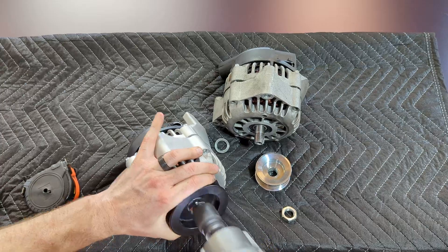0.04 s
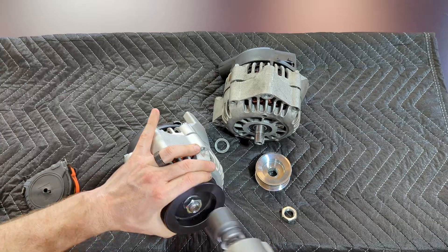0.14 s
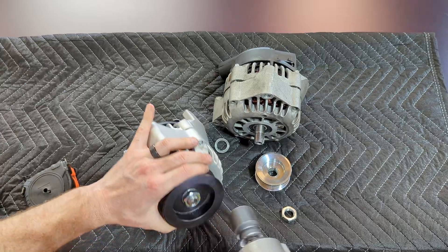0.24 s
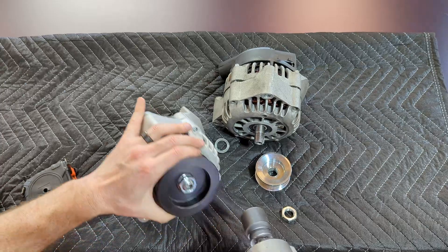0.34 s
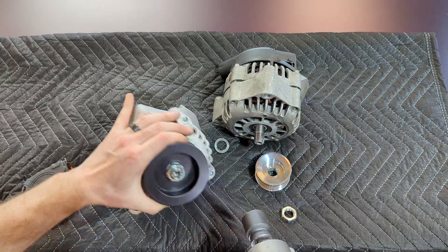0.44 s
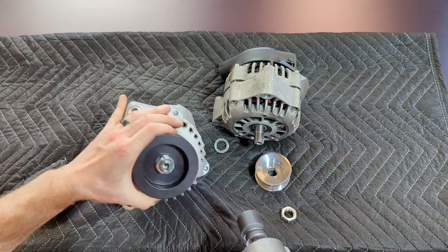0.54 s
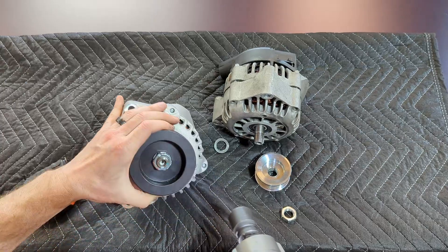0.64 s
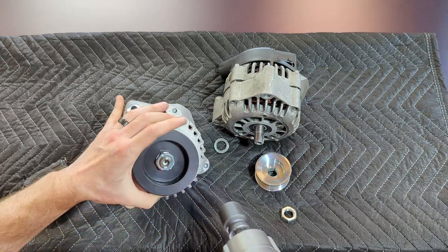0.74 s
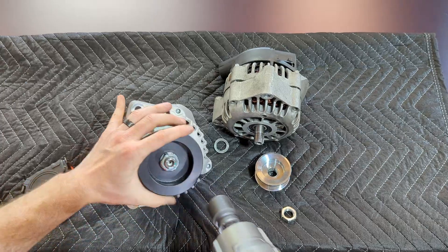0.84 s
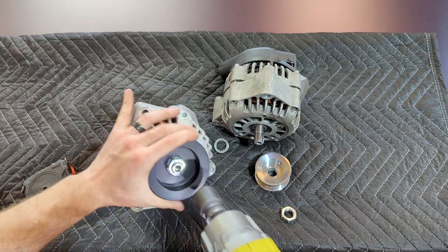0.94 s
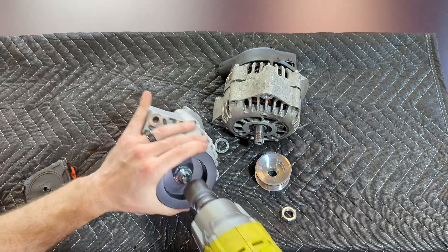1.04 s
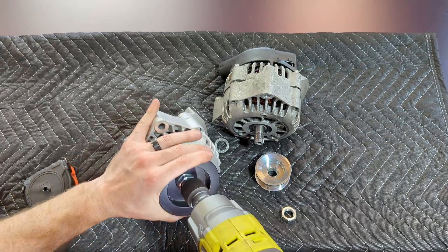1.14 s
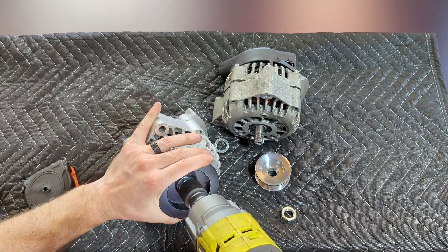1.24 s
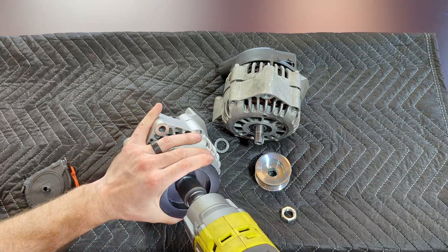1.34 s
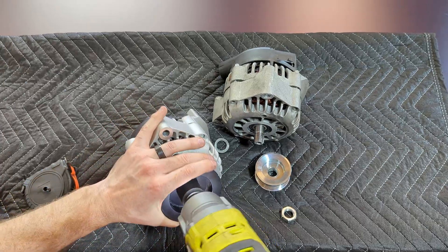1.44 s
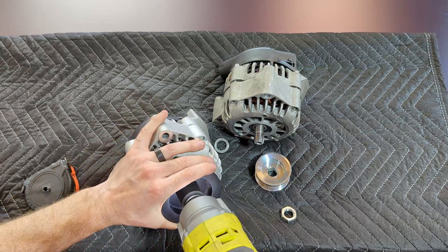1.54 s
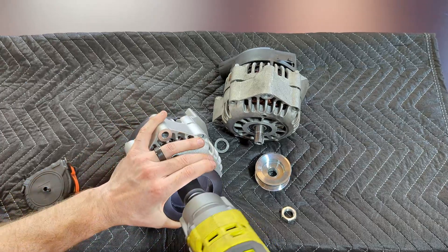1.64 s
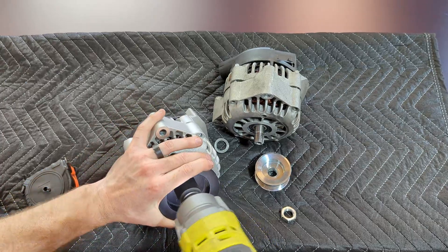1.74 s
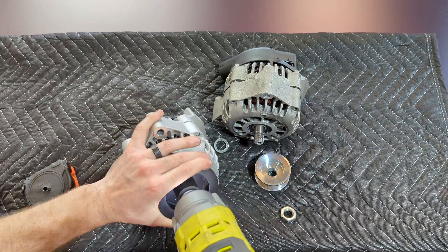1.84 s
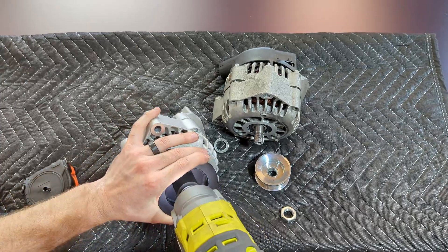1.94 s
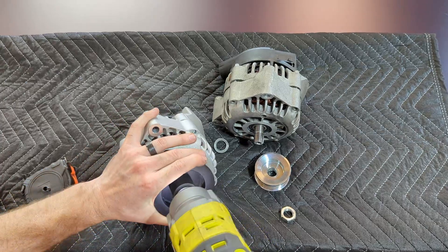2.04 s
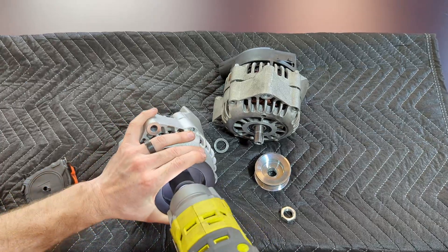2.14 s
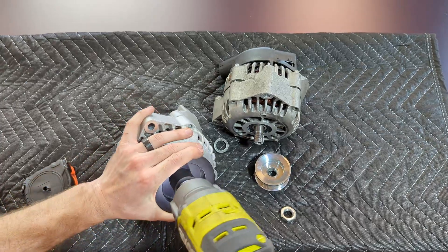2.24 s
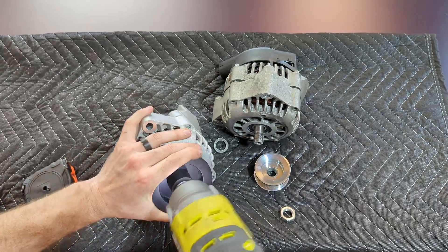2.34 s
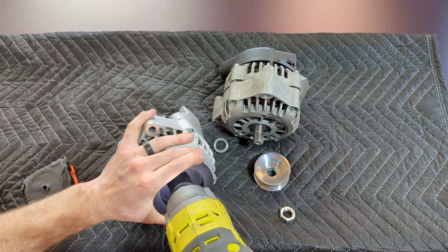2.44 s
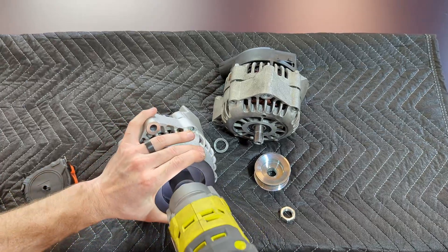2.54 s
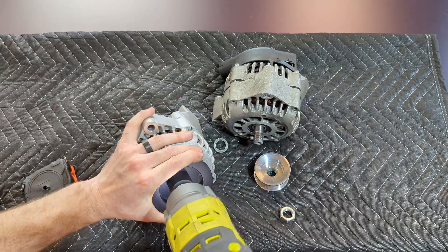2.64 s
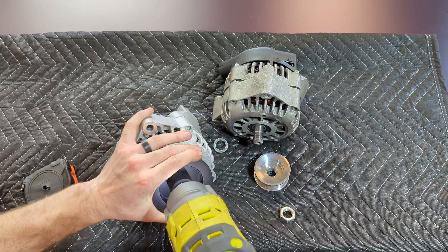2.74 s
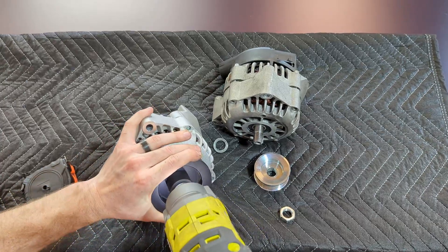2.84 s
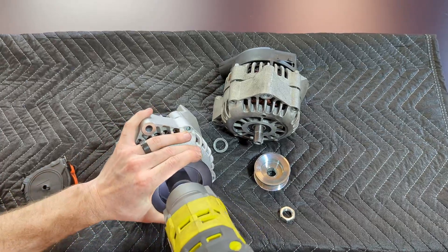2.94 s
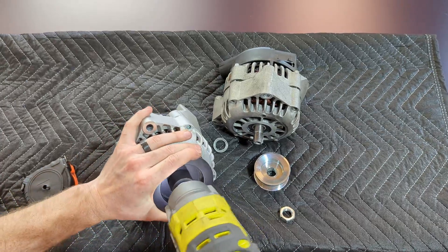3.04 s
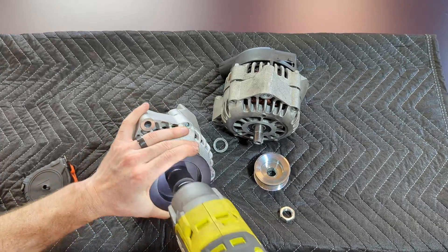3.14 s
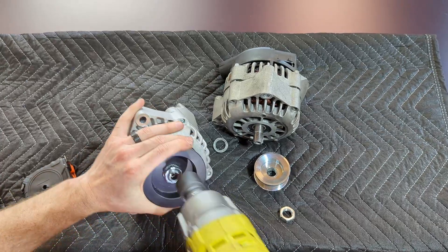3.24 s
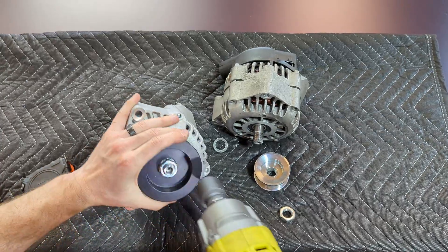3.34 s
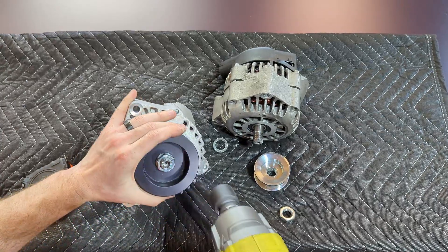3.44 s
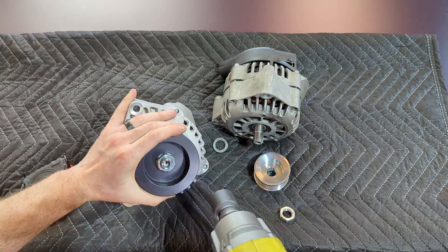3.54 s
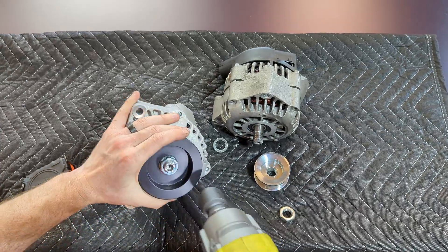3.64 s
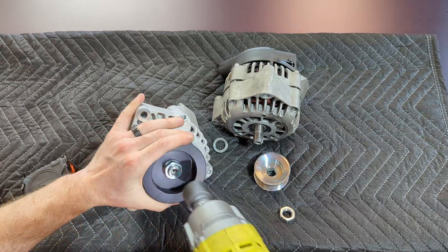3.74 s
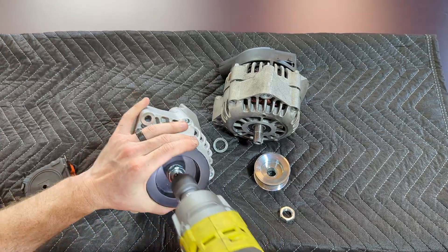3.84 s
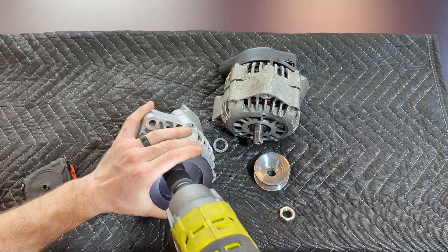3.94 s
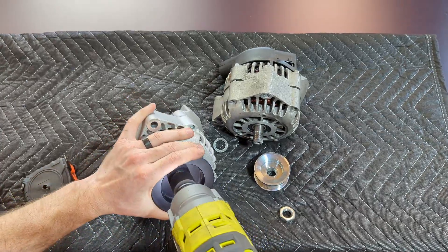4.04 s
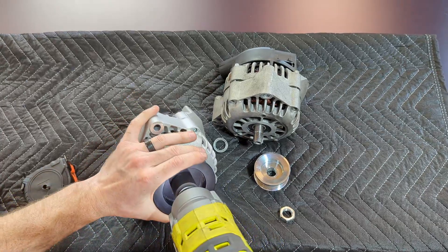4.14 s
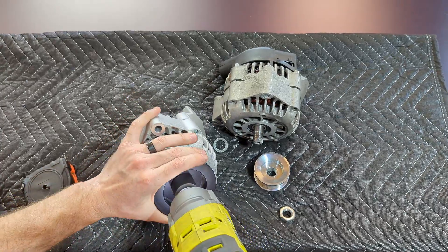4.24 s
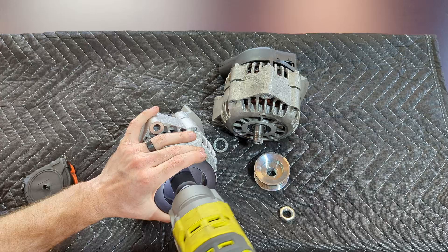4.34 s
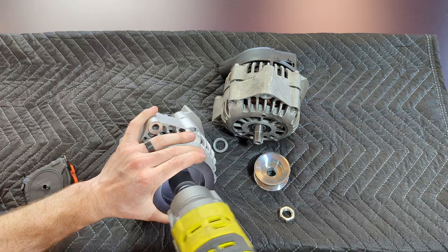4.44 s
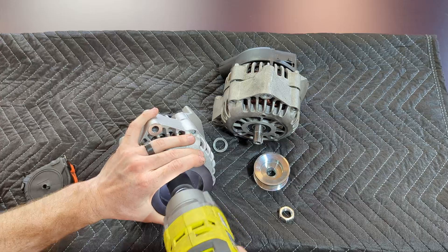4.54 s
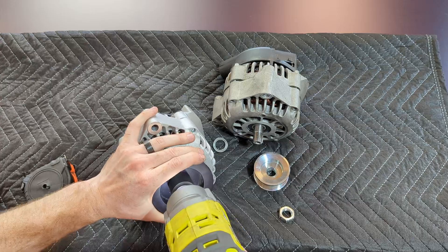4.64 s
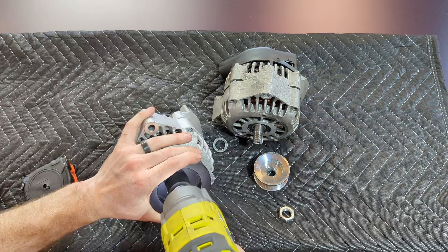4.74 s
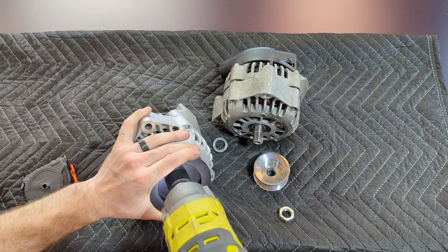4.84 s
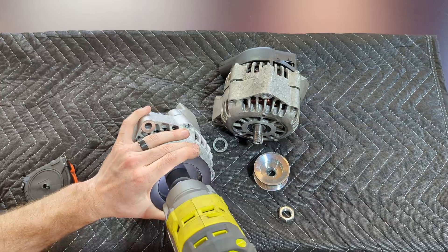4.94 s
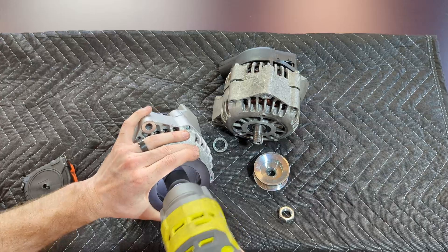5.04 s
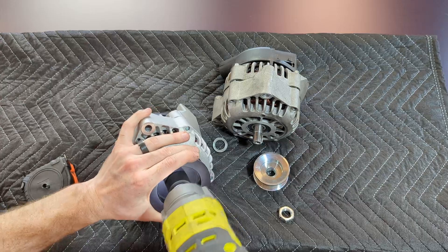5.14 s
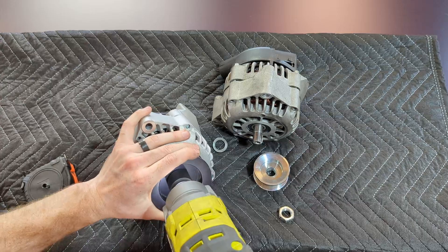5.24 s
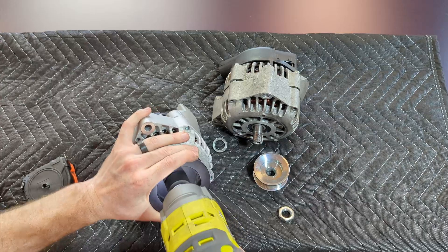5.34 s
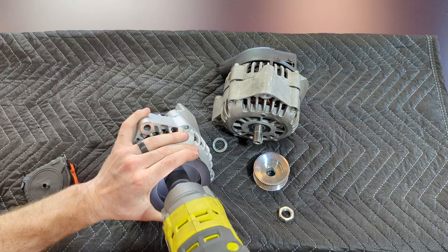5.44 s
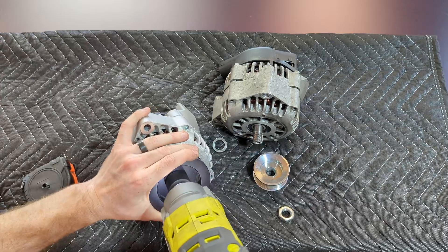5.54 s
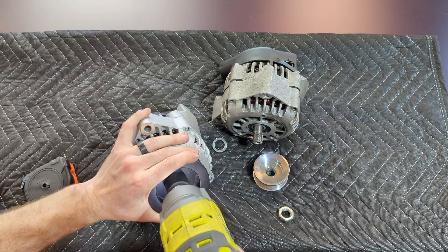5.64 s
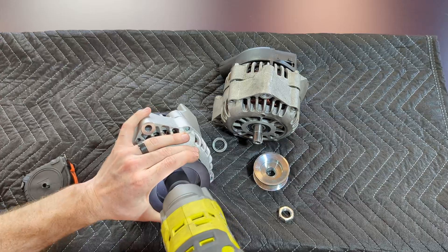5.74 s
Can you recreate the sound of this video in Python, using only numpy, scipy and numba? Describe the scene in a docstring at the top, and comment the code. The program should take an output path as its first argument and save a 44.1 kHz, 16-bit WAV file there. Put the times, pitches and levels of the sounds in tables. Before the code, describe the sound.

A dying metallic echo fades at the start, leaving faint low rumble and hiss; a soft air pop hits mainly the left side at 0.4 s. From 1.3 to 1.6 s a steel socket ticks and clinks onto a nut, ending with a dull double thud of the heavy housing on padding. An impact wrench bursts at 1.7-1.9, 2.0-2.2 and 2.4-3.1 s: quick motor spin-up, hard first bite, then uneven blows around eighty per second, bright and ringing, over rasping gears that whine down. Slower, drier stutters precede and follow the long burst. Quiet returns around 3.4 s with a tiny bump at 3.6. Clinks with thin high pings come at 4.0-4.3 s, then bursts at 4.5-4.7, 4.8-5.0 and 5.1-5.8 s, the last nearly to the end. Close stereo, peaks limited, low gusts from the tool's fan, short diffuse workshop echo.

```python
"""A cordless impact wrench tightens the nut of an alternator pulley on a padded bench in a small workshop.
In each burst the motor spins up, the hammer strikes uneven blows that ring socket and pulley as decaying sines
under cracks of noise, and the gears rasp, whine and coast down. Before the bursts the socket clinks onto the nut.
The tool's fan blows on the two close microphone ports as gusty low noise; a faint rumble and hiss lie behind."""
import sys
import numpy as np
from scipy import signal
from scipy.fft import rfft, irfft
from scipy.io import wavfile
from scipy.ndimage import uniform_filter1d, minimum_filter1d
from numba import njit

SR = 44100
rng = np.random.default_rng(int(sys.argv[2]) if len(sys.argv) > 2 else 0)


def bounce(signal):
    """Save signal as a 16-bit WAV file at the path given by the first command-line argument."""
    frames = np.transpose(np.atleast_2d(signal))
    limited = np.clip(frames, -1, 1)
    pcm = np.round(limited * 32767).astype(np.int16)
    wavfile.write(sys.argv[1], SR, pcm)


N = 255780
T = np.arange(N) / SR

# Pulls of the trigger: pressed_s, hammer_bites_s, eased_s, blows_db, bite_crack_db, bite_ring_db, gears_db,
# overrun_speed_hz, coast_s
PULLS = [(1.712, 1.7259, 1.907, -3.5, -7, -8.5, -24.5, 295, .21),
         (2.035, 2.0667, 2.23, 0, -9.5, -4.5, -25, 240.4, .28),
         (2.356, 2.3654, 3.08, -.5, -1, -16, -25.5, 210, .28),
         (4.447, 4.47, 4.66, -2, -0.5, -0.5, -25.5, 279.8, .18),
         (4.757, 4.787, 4.975, -2, -9, -3, -26, 295, .19),
         (5.074, 5.111, 5.803, -.5, -5.5, -2, -25, 220, .2)]
# Modes of socket, shaft and pulley: mode_hz, level_db, t60_s
STEEL_MODES = [(281, -18, 0.18), (463, -39.5, 0.06), (572.6, -12, 0.13), (719, -6, 0.046),
               (1180, -31, .025), (1302, -1, 0.09), (1371, 3, 0.083), (1421, 0, 0.082), (1440, -1, 0.037),
               (2605, 2, 0.072), (2580, 7.5, 0.064), (2688, 3.5, 0.11), (2620, -13, .03),
               (3990, -37, 0.019), (5750, -10.5, .07), (6070, 1.5, 0.076), (6520, -7, 0.1),
               (7200, -17.5, 0.051), (8500, -14.5, 0.032), (9552, -12.5, .05), (12800, -14.5, 0.055)]
# Noise spectrum of a hard, dry knock: frequency_hz, density_db
KNOCK_SPECTRUM = [(100, -25.5), (600, -20.5), (1500, -4.5), (2500, 0.5), (4000, 5), (7000, -2.5),
                  (10000, -1.5), (13000, -11.5), (16000, -25.5)]
# Noise spectrum of the gears: frequency_hz, density_db
GEAR_SPECTRUM = [(100, -20), (300, -9.5), (800, -4.5), (1400, -0.5), (2000, 1.5), (3300, 5), (5000, 0.5),
                 (7000, -3.5), (9700, -0.5), (11500, -12.5), (16000, -29)]
# Rotor speed under the hammer's load
LOADED_HZ = 219.5


def undb(db):
    """Decibels to gain."""
    return 10 ** (np.asarray(db) / 20)


def unit(x):
    """Scale to rms 1."""
    return x / np.sqrt(np.mean(x ** 2))


def along(points, hz):
    """Read (Hz, value) points on a log-frequency axis."""
    f, value = np.transpose(points)
    return np.interp(np.log(np.maximum(hz, 1)), np.log(f), value)


def bins(x):
    """Frequencies of the spectrum of x."""
    return np.fft.rfftfreq(x.shape[-1], 1 / SR)


def colour(x, points):
    """Filter by (Hz, dB) points, keeping the power of white noise."""
    gain = unit(undb(along(points, bins(x))))
    return irfft(rfft(x) * gain, x.shape[-1])


def ring(x, response):
    """Play x through an impulse response."""
    return signal.fftconvolve(np.atleast_2d(x), np.atleast_2d(response), axes=-1)[:, :N]


def fade(t60):
    """Exponential decay, half a second long."""
    return np.exp(-np.log(1000) * T[:SR // 2] / t60)


def strikes(times, db):
    """A train of impulses."""
    x = np.zeros(N)
    inside = times < T[-1]
    samples = (np.maximum(times[inside], 0) * SR).astype(int)
    np.add.at(x, samples, undb(db)[inside])
    return x


def hiss():
    """Noise at two ports, whose likeness varies with frequency."""
    # How alike the two ports hear it: frequency_hz, likeness (0-1)
    likeness = [(100, 0.04), (600, 1), (1400, 0.8), (3000, 0.7), (6000, 0.87), (10000, 0.6), (16000, 0.05)]
    mid, side = rfft(rng.standard_normal((2, N)))
    like = np.clip(along(likeness, bins(T)), 0, 1)
    mid = mid * np.sqrt((1 + like) / 2)
    side = side * np.sqrt((1 - like) / 2)
    return irfft([mid + side, mid - side], N)


@njit
def sines(rows, length):
    """Add a decaying sine for each row of (start sample, radians per sample, gain, samples to fall 60 dB)."""
    out = np.zeros(length)
    for start, step, gain, life in rows:
        z = gain + 0j
        pole = np.exp(1j * step - np.log(1000) / life)
        for i in range(int(start), min(int(start + life), length)):
            z *= pole
            out[i] += z.imag
    return out


def crack(times, db, spectrum, t60):
    """Countless short-lived modes: a burst of noise at each contact."""
    pole = np.exp(-np.log(1000) / (t60 * SR))
    # the tiny offset keeps the decay clear of denormal numbers
    envelope = signal.lfilter([1], [1, -pole], strikes(times, db) + 1e-18)
    return colour(envelope * hiss(), spectrum)


def modes(times, db, table, sustain=1, tilt=0, scatter_db=2.2, detune=.0045):
    """Each contact lands differently: it shares its force anew among the modes and detunes them a little."""
    hz, mode_db, t60 = np.transpose(table)
    chance = rng.standard_normal((len(times), 2, len(hz)))
    # a positive tilt lifts the modes above 2 kHz and lowers those below
    tilt_db = np.outer(tilt, np.tanh(2 * np.log2(hz / 2000)))
    gain = undb(db[:, None] + mode_db + scatter_db * chance[:, 0] + tilt_db)
    step = 2 * np.pi * hz * (1 + detune * chance[:, 1]) / SR
    start = np.maximum(times, 0)[:, None] * SR
    rows = np.stack(np.broadcast_arrays(start, step, gain, t60 * sustain * SR), axis=-1)
    return sines(np.concatenate(rows), N)


def hammer(jitter=.15, scatter_db=3.0, rebound_share=.55, rebound_db=-11, bright_db=4.0):
    """Uneven blows on the anvil; after each the loose socket rebounds against the nut."""
    # Noise spectrum of a hammer blow: frequency_hz, density_db
    blow_spectrum = [(100, -22.5), (250, -13), (800, -7), (1300, 9.5), (1900, 1.5), (3000, 7), (4500, 3.5),
                     (7000, 1.5), (10000, 1.5), (13000, -2.5), (16000, -10.5)]
    blows_per_s, bite_s = 82, .026  # steady hammering begins once the bite is over
    blows = []
    for _, bite, end, db, *_ in PULLS:
        chance = rng.standard_normal((96, 4))
        gaps = np.maximum(1 + jitter * chance[:, 0], .5) / blows_per_s
        times = bite + bite_s + np.cumsum(gaps) - gaps
        blow_db = db + scatter_db * chance[:, 2]
        back = times + gaps * (rebound_share + .13 * chance[:, 1])
        back_db = db + rebound_db + 3 * chance[:, 3]
        rows = np.column_stack([times, blow_db, back, back_db])
        blows.append(rows[times < end])
    times, db, back, back_db = np.concatenate(blows).T
    times, db = np.r_[times, back], np.r_[db, back_db]
    # a square hit is bright, a glancing one rings the low modes
    bright = bright_db * rng.uniform(-1.7, 1.7, len(times))
    cracks = crack(times, db - 10.5, blow_spectrum, t60=0.017)
    cracks = cracks + crack(times, db + bright - 12.5, KNOCK_SPECTRUM, t60=0.015)
    return cracks + modes(times, db - 31, STEEL_MODES, tilt=bright)


def bites(count=3, gap_s=0.0073, crack_fall_db=2.5, ring_fall_db=13):
    """The free-running hammer catches the anvil and spends its speed in quick, ever weaker blows."""
    # rows of (s, crack dB, ring dB); the falls are per blow
    return [(bite + k * gap_s, crack_db - k * crack_fall_db, ring_db - k * ring_fall_db)
            for _, bite, _, _, crack_db, ring_db, *_ in PULLS for k in range(count)]


def stutters(crack_db_per_s=-22, ring_db_per_s=-100):
    """Slow, even, dry blows on an eased trigger, whose ring dies away faster than their crack."""
    # Runs of blows: start_s, end_s, blows_per_s, crack_db, ring_db
    runs = [(2.254, 2.353, 65, -7, -14.5), (3.091, 3.223, 63.8, -9, -13)]
    # rows of (s, crack dB, ring dB)
    return [(start + age, crack_db + crack_db_per_s * age, ring_db + ring_db_per_s * age)
            for start, end, rate, crack_db, ring_db in runs for age in np.arange(0, end - start, 1 / rate)]


def knocks():
    """Pressed tight, the socket gives a dry crack; loose, it rings."""
    # Single blows, ringing mostly in the low modes: time_s, crack_db, ring_db
    single_blows = [(1.889, 1.5, 0), (1.902, -4, -6.5), (2.235, -3.5, 0.5), (4.494, -11, 0.5)]
    times, db, ring_db = np.transpose(list(single_blows) + bites() + stutters())
    cracks = crack(times, db + 0.5, KNOCK_SPECTRUM, t60=0.012)
    return cracks + modes(times, ring_db - 24.0, STEEL_MODES, tilt=-4.0)


def drive(free_hz=335.5, spin_up_s=.022, sag_s=.05, overrun_s=.045, surge_db=2.5):
    """Rotor speed (Hz) and gear gain: the motor spins up, sags under load, is let go and coasts to rest."""
    # the gears change level with overrun speed and fade with a power of the remaining coast
    overrun_db_per_octave, coast_power = 6, 3.94
    speeds, gains = [], []
    for pressed, bite, eased, *_, gears_db, overrun_hz, coast_s in PULLS:
        spin = np.clip((T - pressed) / spin_up_s, 0, 1)
        coast = np.clip(1 - (T - eased - overrun_s) / coast_s, 0, 1)
        stages = [bite, bite + sag_s, eased, eased + overrun_s]
        running_hz = np.interp(T, stages, [free_hz, LOADED_HZ, LOADED_HZ, overrun_hz])
        overrun_db = overrun_db_per_octave * np.log2(overrun_hz / LOADED_HZ)
        running_db = gears_db + np.interp(T, stages, [surge_db, 0, 0, overrun_db])
        speeds.append(spin * running_hz * coast)
        gains.append(spin * undb(running_db) * coast ** coast_power)
    return np.max(speeds, axis=0), np.max(gains, axis=0)


def motor(speed, gain, throb=0.26, whine_db=-11, mesh_db=-13, teeth_count=12):
    """Gears rasp once a rotor turn and whine on its multiples, with an added tone at the tooth rate."""
    wander = unit(colour(rng.standard_normal(N), [(40, -4.0), (300, -43.5), (2000, -100)]))
    hz = speed * (1 + .012 * wander)
    turn = 2 * np.pi * np.cumsum(hz) / SR
    rasp = hiss() * (1 + throb * np.cos(turn))
    # the same small flaws of the teeth come round on every turn
    flaws = irfft(np.r_[0, np.exp(2j * np.pi * rng.random(36))], 1024)
    angles = np.linspace(0, 2 * np.pi, len(flaws), endpoint=False)
    whine = np.interp(turn, angles, unit(flaws), period=2 * np.pi)
    mesh = np.sqrt(2) * np.sin(teeth_count * turn)
    gears = colour(rasp + undb(whine_db) * whine, GEAR_SPECTRUM)
    return (gears + undb(mesh_db) * mesh) * gain


def draught(speed, level_db=-25, gust_db=2, lag_s=.05, steepness=3):
    """Cooling air reaches the ports in gusts; its flow lags the motor's speed and grows steeply with it."""
    # Noise spectrum of the moving air: frequency_hz, density_db
    wind_spectrum = [(3, 4), (12, -4.5), (25, -4), (50, -20.5), (100, -30), (200, -61.5), (1000, -83.5)]
    pole = np.exp(-1 / (lag_s * SR))
    lagged_speed = signal.lfilter([1 - pole], [1, -pole], speed + 1e-9)
    flow = (lagged_speed / LOADED_HZ) ** steepness
    sway = unit(colour(rng.standard_normal(N), [(8, -6.0), (40, -36.5), (400, -100)]))
    wind = colour(rng.standard_normal((2, N)), wind_spectrum) * undb(gust_db * sway)
    return unit(wind) * flow * undb(level_db)


def clinks(hardness_db=10, rebound_s=0.0065):
    """Light steel contacts that rebound once, damped by the hand; the free socket adds a thin, high ping."""
    # The socket touches and seats on the nut:
    # time_s, crack_db, ring_db, ring_brightness_db, high_ping_db, rebound_db
    contacts = [(1.2766, -29, -22.5, 1, -17, -3.5), (1.294, -38, -25.5, -3, -16, -24),
                (1.329, -29.5, -25, 0, 0, -4), (1.438, -38, -50, 0, -23, -6),
                (1.4507, -30, -25.5, 3.5, -7, -3), (1.486, -31, -31, -4, -29, -20),
                (1.495, -19, -11.5, 0, -10, -16), (1.512, -14.5, -24, 4, -10, -20.5),
                (1.516, -21, -12, -7, -11.5, -22), (1.605, -36, -31, -2, -25, -12),
                (4.0302, -23, -20, -1, 13.5, -22), (4.098, -35, -38, 0, -13, -4),
                (4.13, -28, -34, -5, -4, -20), (4.138, -19, -19, 7, 10, -4), (4.228, -37, -50, 0, -20, -6),
                (4.2425, -16.5, -16, 4.5, -5, -13), (4.261, -27.5, -18.5, -10, -19, -22)]
    # Noise spectrum of a light contact: frequency_hz, density_db
    tick_spectrum = [(100, -11.5), (700, -10), (1400, 4), (2000, -13), (2700, 0.5), (4500, -4.5),
                     (7000, -8.5), (9500, -7.5), (12000, -23.5), (16000, -31)]
    times, db, ring_db, tilt, ping_db, rebound_db = np.transpose(contacts)
    times, tilt = np.r_[times, times + rebound_s], np.r_[tilt, tilt]
    db, ring_db, ping_db = (np.r_[first, first + rebound_db] for first in (db, ring_db, ping_db))
    ping = modes(times, ping_db - 44.5, [(13150, -4.5, 0.044), (13330, -13.5, .04)])
    steel = modes(times, ring_db - 29.0, STEEL_MODES, sustain=0.85, tilt=tilt)
    steel = colour(steel, [(1400, -2.5), (2700, 0.5), (6000, -8)])
    # a gentler contact has a weaker tick beside its duller clack
    softness_db = hardness_db * (db - db.max()) / 20
    tick = crack(times, db + softness_db - 7.5, tick_spectrum, t60=0.036)
    clack_spectrum = [(300, -24.5), (1400, -10.5), (2700, 1), (4000, -13.5), (12000, -40.0)]
    clack = crack(times, db - 13.5, clack_spectrum, t60=0.051)
    return tick + clack + steel + ping


def bumps():
    """The heavy housing thuds and rocks on its blanket."""
    # Dull bumps of the alternator on the padded bench: time_s, level_db
    thuds = [(1.516, -11), (1.606, -.5), (1.618, -5), (3.625, -26), (4.15, -20.5), (4.241, -26),
             (4.263, -18)]
    # Modes of the alternator on the blanket: mode_hz, level_db, t60_s
    bench_modes = [(84, -2.5, 0.12), (111.3, 2.5, 0.22), (190, -0.5, 0.054), (285, -4, 0.071),
                   (369, -3.5, 0.025), (550, -12.5, 0.051), (820, -12.5, 0.044)]
    # Noise spectrum of a thud: frequency_hz, density_db
    thud_spectrum = [(40, -0.5), (110, 0.5), (350, -1.5), (800, -12.5), (2000, -31.5), (8000, -51.5)]
    times, db = np.transpose(thuds)
    return modes(times, db - 27.0, bench_modes) + crack(times, db - 32.0, thud_spectrum, t60=0.11)


def room(x, wet_db=-11, gap_s=0.0046):
    """Diffuse echo of the small workshop, different at each port, longest around 1 kHz."""
    # Decay of the workshop: frequency_hz, t60_s
    decays = [(200, 0.25), (1000, 0.39), (3000, 0.3), (7000, 0.31), (10000, 0.25), (13000, 0.25)]
    t = T[:SR // 2]
    noise = rfft(rng.standard_normal((2, len(t))))
    centres = np.transpose(decays)[0]
    tail = 0
    # each band fades at its own rate and overlaps its neighbours
    for share, (_, t60) in zip(np.eye(len(centres)), decays):
        band = along(np.column_stack([centres, share]), bins(t))
        tail = tail + irfft(noise * band, len(t)) * fade(t60)
    tail = tail * (t > gap_s)
    return undb(wet_db) * ring(x, unit(tail) / np.sqrt(len(t)))


def dying_echo(level_db=-31, t60=0.29):
    """The last of an earlier burst fades in the room: gear-coloured noise and long-ringing steel."""
    start = np.zeros(1)
    rasp = crack(start, start + level_db, GEAR_SPECTRUM, t60)
    return rasp + modes(start, start - 44, STEEL_MODES, sustain=2.8)


def puffs(relax_s=0.076, sway_hz=7):
    """Air pops on the left port, barely on the right: pressure jumps, swings back slowly and relaxes."""
    # Puffs of air: time_s, level_db
    pops = [(0.423, -22), (3.625, -39.5)]
    swing = np.exp(-T / relax_s) * np.cos(2 * np.pi * sway_hz * T)
    left = ring(strikes(*np.transpose(pops)), swing)[0]
    soften = signal.butter(1, 2500, fs=SR)
    return np.outer([1, .08], -signal.lfilter(*soften, left))


def background(rumble_db=-54):
    """Low steady rumble of the shop under a faint hiss that swells and sinks."""
    # Noise spectrum of the rumble: frequency_hz, density_db
    shop_spectrum = [(10, -3.5), (45, 2), (85, 3), (130, -4), (190, -17.5), (400, -21), (800, -20.5),
                     (1500, -33), (3000, -43.5), (16000, -64.5)]
    # Noise spectrum of the hiss: frequency_hz, density_db
    air_spectrum = [(200, -0.5), (800, 2.5), (3000, 0), (6000, -9.5), (9000, -12.5), (12000, -28),
                    (16000, -26.5)]
    # Course of the hiss: time_s, level_db
    hiss_course = [(.15, -66), (.5, -71), (.9, -70.5), (1.25, -72), (3.3, -62.5), (3.6, -65), (4.0, -63.5),
                   (5.8, -77)]
    # noise of each port's own plus noise common to both
    rumble = unit(colour(rng.standard_normal((2, N)) + rng.standard_normal(N), shop_spectrum))
    hiss_gain = undb(np.interp(T, *np.transpose(hiss_course)))
    return undb(rumble_db) * rumble + colour(hiss(), air_spectrum) * hiss_gain


def scene():
    """Tool and work close by, the room around them, air on the microphone."""
    speed, gear_gain = drive()
    tool = hammer() + knocks() + motor(speed, gear_gain)
    handling = clinks() + bumps()
    # the hand and the blanket shield the small contacts from the walls
    echo = room(tool + undb(-2) * handling)
    return tool + handling + echo + dying_echo() + draught(speed) + puffs() + background()


def limiter(x, top_db=-3, hold_s=0.0042):
    """Turn both ports down for a few milliseconds around each loud peak."""
    size = int(hold_s * SR) + 1
    gain = np.minimum(1, undb(top_db) / (np.abs(x).max(axis=0) + 1e-9))
    return x * uniform_filter1d(minimum_filter1d(gain, size), size)


def record(dry):
    """The ports differ in phase and level along the spectrum; peaks are limited and the top is cut."""
    # Left minus right: frequency_hz, level_difference_db
    balance = [(200, 0.5), (600, 0), (1300, -3.5), (2400, -1.5), (4400, -2.5), (8100, 5.5), (12000, 0)]
    # Phase by which the left port lags: frequency_hz, lag_radians
    port_lag = [(40, 0), (100, 0.38), (700, -0.56), (1400, -0.45), (2300, -0.7), (4600, 1), (8000, 2),
                (10500, 2.5), (13500, 6)]
    hz = bins(dry)
    tilt_db = along(balance, hz) / 2
    left = undb(tilt_db) * np.exp(-1j * along(port_lag, hz))
    right = undb(-tilt_db)
    heard = limiter(irfft(rfft(dry) * np.array([left, right]), N))
    top_cut = signal.ellip(10, .2, 80, 16000, fs=SR, output="sos")  # steep low-pass at 16 kHz
    return signal.sosfilt(top_cut, heard)


dry = scene()
out = record(dry)
bounce(out)
```